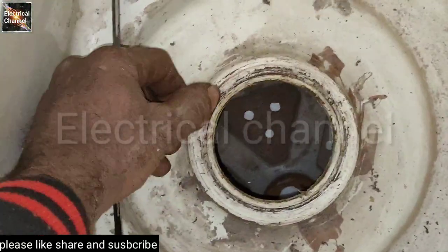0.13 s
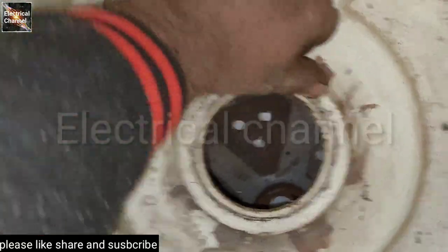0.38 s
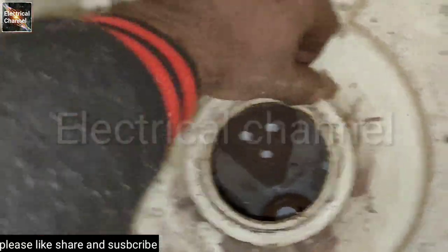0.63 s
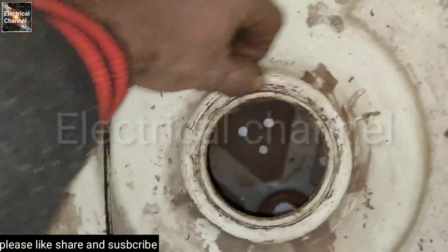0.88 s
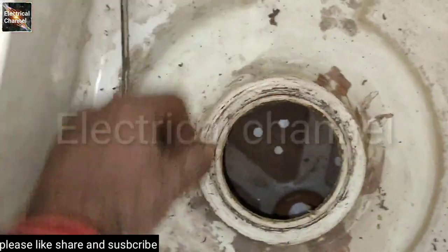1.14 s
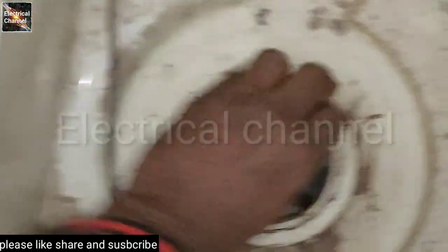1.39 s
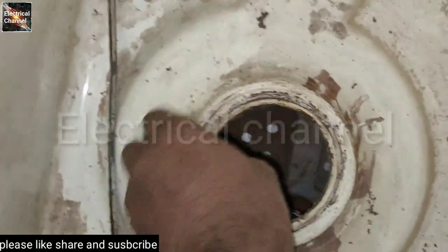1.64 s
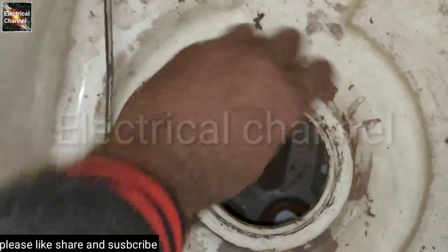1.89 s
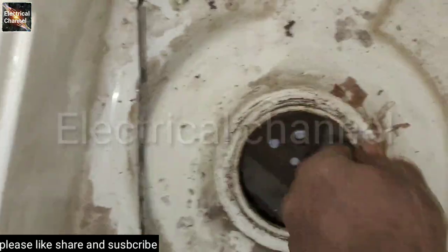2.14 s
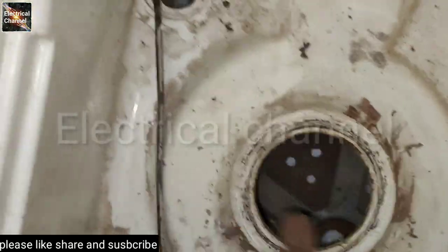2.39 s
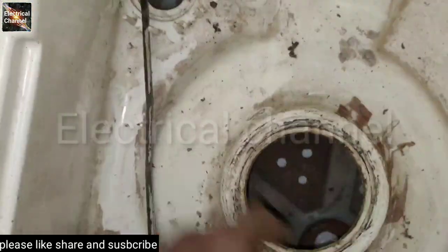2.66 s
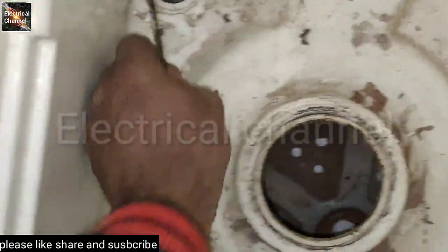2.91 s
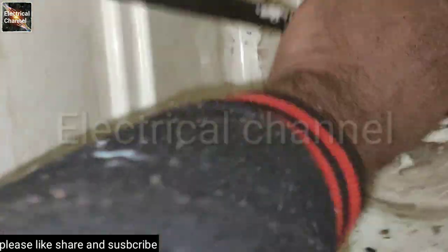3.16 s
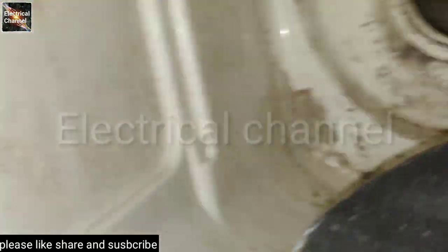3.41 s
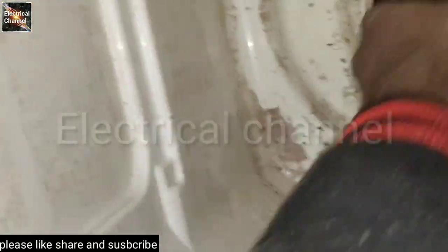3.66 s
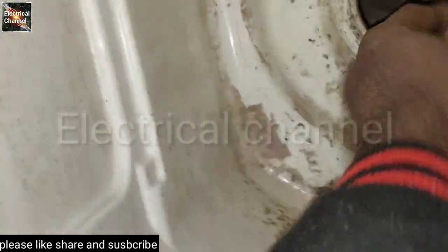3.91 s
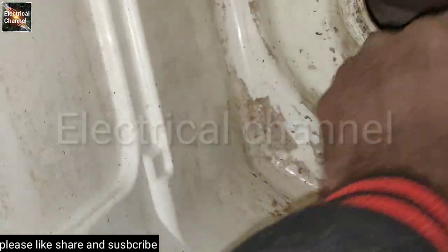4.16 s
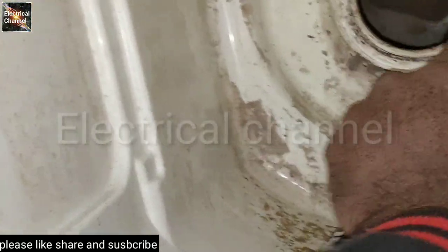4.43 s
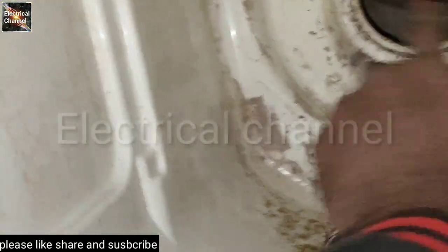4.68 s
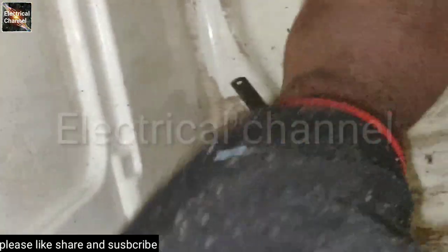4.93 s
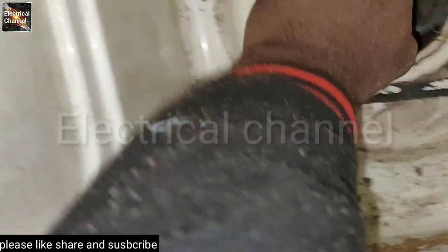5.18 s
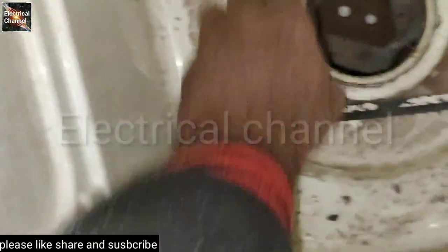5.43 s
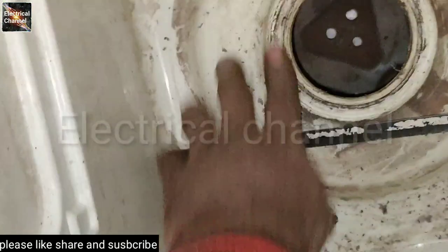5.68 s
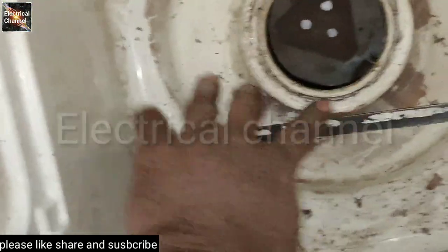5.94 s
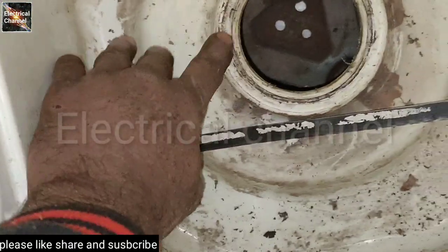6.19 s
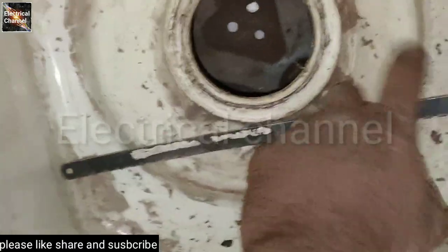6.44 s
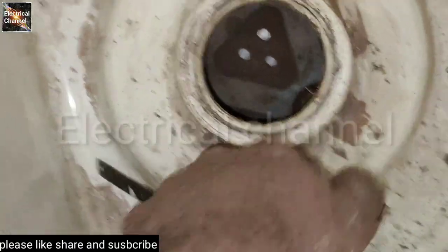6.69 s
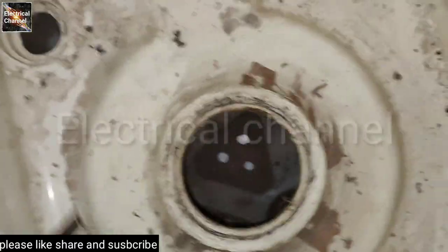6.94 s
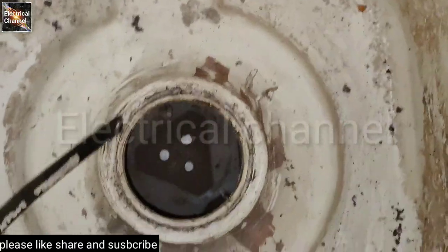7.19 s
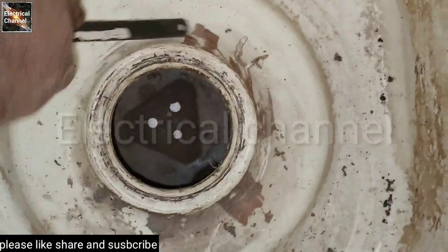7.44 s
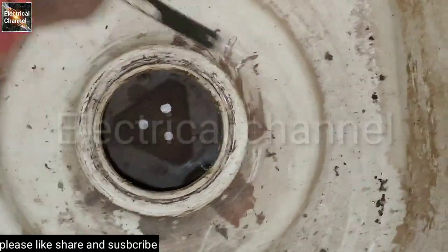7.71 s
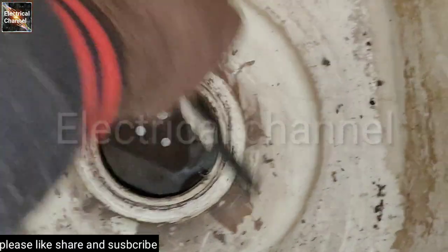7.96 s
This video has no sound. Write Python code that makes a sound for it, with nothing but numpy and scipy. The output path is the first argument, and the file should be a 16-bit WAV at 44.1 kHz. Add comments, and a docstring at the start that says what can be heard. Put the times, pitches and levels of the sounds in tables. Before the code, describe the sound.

Very close in a quiet room, fingers thump and rub a hollow plastic tub, making short low booms with little treble. After about three seconds a thin metal blade joins in, with dry gritty rasps, hard clicks and knocks on the wall. The clatter peaks near five seconds, eases, then returns in scattered scrapes and ends on a loud rasping clack. The loudest hits distort, and sound drops out once near the end.

```python
"""A hand rubs round the plastic rim of a washing machine tub and drags a thin saw blade over it, close by.
Sticking and slipping skin makes the hollow tub boom, while rubbed grit rasps and fizzes as noise-like grains.
Fingers thump as short low swings; the blade clicks as noise bursts, knocks the wall and rings as fading tones.
Behind it lies faint, drifting room noise; loud thumps overload the input, and it falls silent once, briefly."""
import sys
import numpy as np
from scipy import signal
from scipy.fft import rfft, irfft, next_fast_len
from scipy.io import wavfile
from scipy.ndimage import uniform_filter1d

SR = 44100
rng = np.random.default_rng(int(sys.argv[2]) if len(sys.argv) > 2 else 0)


def materialize(psi):
    """Save the field psi as 16-bit PCM at rate SR to the path in sys.argv[1].

    A 1-D psi becomes a single channel; in a 2-D psi each row is a channel.
    """
    bounded = np.clip(np.atleast_2d(psi).T, -1, 1)
    quanta = np.round(bounded * 32767).astype(np.int16)
    wavfile.write(sys.argv[1], SR, quanta)


def attenuation_scalar(level_db):
    """Turn a level in dB into a linear amplitude multiplier (20 dB per decade)."""
    decades = np.asarray(level_db, float) / 20
    return 10 ** decades


N = 356460  # length in samples

# Rubs of the hand or blade. Each row: start in seconds, length in seconds, boom level in dB,
# upper tub modes in dB, rasp in dB, fizz in dB.
RUB_STROKES = [(0.0, 0.068, -27, -41, -64, -59), (0.062, 0.099, -30, -30, -46.5, -53.5),
               (0.162, 0.046, -35, -38, -50, -55), (0.242, 0.077, -20.5, -34, -43.5, -53),
               (0.329, 0.097, -18, -25, -44.5, -41.5), (0.469, 0.082, -16, -21.5, -40.5, -51),
               (0.597, 0.099, -18.5, -25, -40, -51), (0.736, 0.15, -17.5, -23.5, -38.5, -45),
               (0.92, 0.068, -16, -28, -42.0, -50), (0.998, 0.081, -23, -24, -37.5, -41.5),
               (1.121, 0.15, -28.5, -38.5, -38.5, -48), (1.212, 0.08, -19, -26, -42, -46.5),
               (1.308, 0.092, -17.5, -26, -31.5, -39), (1.419, 0.1, -28.5, -42, -40, -47.5),
               (1.567, 0.053, -22, -24.5, -39.0, -52), (1.605, 0.046, -19, -24.5, -34.5, -47.0),
               (1.708, 0.07, -24, -25, -35, -44.5), (1.824, 0.16, -25.5, -27, -36.5, -46),
               (2.045, 0.14, -20, -24, -34, -42.5), (2.243, 0.047, -20.5, -40.0, -44, -51),
               (2.297, 0.28, -29.5, -32.5, -40.5, -51), (2.392, 0.12, -35, -40, -33.5, -38.5),
               (2.569, 0.17, -38, -29, -36.5, -37), (2.757, 0.089, -23.5, -35.5, -30, -36),
               (2.897, 0.12, -18, -30, -46, -48.5), (2.996, 0.066, -39, -45, -37.5, -42),
               (3.081, 0.11, -21, -26, -29.0, -37.5), (3.189, 0.11, -30.5, -36, -35, -40),
               (3.313, 0.15, -28.5, -46, -39.5, -45.0), (3.41, 0.13, -22, -21, -29.5, -37),
               (3.54, 0.11, -27.0, -36.0, -39.5, -42.5), (3.671, 0.12, -33, -29.0, -32.5, -41),
               (3.724, 0.18, -11, -21, -27, -40), (3.956, 0.063, -6.5, -27.5, -24.5, -34.5),
               (4.046, 0.074, -10.0, -21.0, -27, -37.5), (4.152, 0.073, -32, -40, -35.5, -50),
               (4.212, 0.17, -38, -51, -40.5, -55.5), (4.37, 0.037, -33, -30.5, -37.5, -59),
               (4.412, 0.025, -25, -29, -35.5, -45.5), (4.5, 0.103, -23, -38, -43.5, -57),
               (4.605, 0.13, -20.5, -23.0, -30.0, -43), (4.769, 0.085, -35.0, -39, -35.0, -54),
               (4.878, 0.13, -16, -19.5, -32.5, -40.5), (4.934, 0.04, -21.5, -25, -16, -27),
               (4.985, 0.063, -14.5, -18.5, -20.5, -38), (5.077, 0.073, -17, -39, -30.5, -37),
               (5.161, 0.091, -19, -24.5, -25.5, -36.0), (5.267, 0.066, -38, -47, -42, -54),
               (5.397, 0.1, -36, -37, -37.5, -43.5), (5.541, 0.077, -23, -32.5, -38.5, -30.5),
               (5.628, 0.059, -20.5, -26.5, -38.5, -42.5), (5.707, 0.068, -16.5, -28.5, -26, -45),
               (5.808, 0.158, -30, -36, -41.5, -45), (5.949, 0.141, -27, -41.5, -42, -45),
               (6.105, 0.091, -23, -40, -44, -46.5), (6.176, 0.097, -20, -25.5, -38.5, -45),
               (6.31, 0.081, -26, -46, -46.5, -65.0), (6.404, 0.071, -31.0, -43, -43.5, -48.5),
               (6.461, 0.077, -16, -23, -33, -41), (6.538, 0.094, -24, -32.5, -39.5, -43.5),
               (6.711, 0.044, -26, -23, -29.0, -39), (6.773, 0.073, -33.0, -40, -32, -40),
               (6.872, 0.128, -36.5, -66, -48.5, -55.5), (6.993, 0.063, -38.5, -37, -41, -40),
               (7.115, 0.27, -43.5, -54, -58.5, -60.5), (7.357, 0.06, -18.5, -21.5, -36, -45.5),
               (7.464, 0.24, -33, -28, -34.5, -42.5), (7.498, 0.098, -31, -32.5, -38, -43.5),
               (7.618, 0.06, -20, -18, -41, -47.5), (7.734, 0.038, -20.5, -29, -50, -39),
               (7.795, 0.053, -15.5, -19, -24.5, -35), (7.899, 0.13, -20.5, -22.5, -34, -43),
               (8.031, 0.091, -15, -16.5, -11, -25.5)]
# Where the hand is. Each row: time in seconds, first hollow in Hz, second hollow in Hz, left over right in dB,
# wall modes in dB against the blend of rasp and upper modes, both hollows in dB.
HAND_PLACES = [(0.0, 1310, 2230, 2.5, -5, -2), (0.09, 1570, 2260, 4.5, -9, 3),
               (0.18, 1320, 2270, -1, 1.5, 7.5), (0.94, 1390, 2130, -1, -8.5, 3),
               (0.99, 1525, 2380, 2, -7.5, 1), (1.62, 1247, 2210, -1, -3, -2),
               (3.06, 1480, 2290, 1, -4, -1), (3.15, 1320, 2140, -2.5, 2, -8.5),
               (3.31, 1670, 2100, 3.5, -6, -2), (3.49, 1250, 2240, -0.5, 0, -7),
               (3.89, 1575, 2090, 0, -1.5, -1.5), (4.0, 1360, 2250, -1.5, 6, 4),
               (4.28, 1640, 2120, 2, -1.5, -2.5), (4.39, 1380, 2190, -1, 0.5, -2.5),
               (5.29, 1280, 2120, -2, 2, -5), (6.91, 1290, 2070, 3, -3, -9), (7.27, 1100, 2370, 10, -21, 3),
               (7.34, 1380, 2060, 2.5, -3.5, 1.5), (7.79, 1145, 2200, -2.5, -0.5, 2),
               (8.08, 1254, 2220, -6.5, -4.5, -2.5)]
# Extra level of the first hollow. Each row: time in seconds, level in dB.
FIRST_HOLLOW_LEVEL = [(0, -3), (1.3, -2), (1.6, 0.5), (4.3, 0), (5.3, 1), (7.2, -2), (7.5, 5.5),
                      (8.08, 8.5)]
# Low modes of the hollow tub. Each row: pitch in Hz, width in Hz, relative level in dB.
LOW_TUB_MODES = [(81.6, 100, -23), (145, 17, -21), (173, 34, 6.5), (198.5, 170, -3)]
# Upper modes of the hollow tub. Each row: pitch in Hz, width in Hz, relative level in dB.
UPPER_TUB_MODES = [(365.7, 41, 7.5), (416, 31, 1.5)]
# Modes of the tub wall. Each row: pitch in Hz, width in Hz, relative level in dB.
WALL_MODES = [(512, 120, -1.5), (590, 28, -4.5), (699, 6.1, -5.5), (820, 480, -25)]
# Wall modes that the blade reaches. Each row: pitch in Hz, width in Hz, relative level in dB.
BLADE_WALL_MODES = [(668, 135, 7), (776, 330, -8)]
# Level of those modes against the other wall modes. Each row: time in seconds, level in dB.
BLADE_WALL_LEVEL = [(0, -21), (2.3, -19), (3.4, -14), (4.3, -17), (4.6, -12), (5.0, 2.5), (5.4, -4.5),
                    (5.9, -10), (6.5, -10.5), (6.9, 1.5), (7.1, -17), (8.08, -20)]
# Modes of the rim. Each row: pitch in Hz, width in Hz, relative level in dB.
RIM_MODES = [(1234, 25, 6.5), (1370, 300, 7.5), (1655, 110, 5), (2010, 630, 5.5), (2330, 180, -6.5),
             (2710, 310, -8.5), (3360, 300, -47), (4540, 1400, -50)]
# Modes of the blade. Each row: pitch in Hz, width in Hz, relative level in dB.
BLADE_MODES = [(5800, 770, 27), (7220, 1400, 20), (7790, 170, 27), (8620, 160, 17.5), (9100, 500, -50),
               (11500, 2500, -37), (14000, 2000, -43)]
# Colour of the rasp. Each row: frequency in Hz, relative level in dB.
RASP_SPECTRUM = [(470, -2), (800, -14), (913, -29), (1120, -4.5), (1530, -6), (1650, -4), (1830, -7),
                 (2300, -6.5), (4600, -26), (5980, -25), (10100, -120)]
# Colour of the fizz on top. Each row: frequency in Hz, relative level in dB.
FIZZ_SPECTRUM = [(2120, -6), (3600, -15.5), (4180, -21), (4540, -15), (5890, -7), (6640, -10.5), (7950, -7),
                 (9010, -11.5), (10500, -18), (14800, -23.5), (15500, -27.5), (16000, -50)]
# Finger thumps on the tub. Each row: start in seconds, level in dB, pitch of the pressed wall in Hz,
# upper modes in dB against the low swing, milliseconds until the hand damps it.
FINGER_THUMPS = [(0.078, -16.5, 153, -24, 11), (0.167, -27, 153, 9, 14), (0.263, -18, 150, 2.5, 40),
                 (0.365, 0, 147, -20, 18), (0.491, -6.5, 111.4, -10, 23), (0.517, 2, 152, -45, 16),
                 (0.549, -6, 148, -22, 12.6), (0.649, -8, 150, -28, 22), (0.666, -5.5, 134, -10, 13),
                 (0.696, -4.5, 146, -29, 9.4), (0.743, -0.5, 162.4, -7, 20), (0.79, 2.5, 155.6, -7, 11),
                 (0.838, -7.5, 141, -29, 33), (0.953, -7.5, 137, 0, 21), (1.042, -12, 119.4, -2.5, 23),
                 (1.143, -12, 161, -2, 24), (1.229, -20.5, 148, -10, 54), (1.331, 1.5, 166, -5, 11),
                 (1.368, -4, 148, -4.5, 20), (1.48, -12, 157.5, -11, 12), (1.577, 4, 147, -0.5, 9.5),
                 (1.63, -15.5, 161, -2, 15), (1.712, -10, 173, -17, 8.8), (1.758, -12, 145.7, -0.5, 15),
                 (1.847, -17.5, 174, 2.5, 10), (1.949, -16, 147, -1, 15), (2.073, -19, 126, 10, 24),
                 (2.254, -0.5, 146, -7, 6.5), (2.438, -11.5, 141, -1, 8.6), (2.615, -19.5, 140, -15, 21),
                 (2.683, -17, 178, -19, 23), (2.784, -13.5, 175, 4.5, 14), (2.83, -12.5, 164, -2, 6.4),
                 (2.911, 2, 151, -3, 8.4), (2.932, -9, 150, -13, 10), (2.964, -0.5, 140, -7.5, 7),
                 (3.17, -18.5, 120, 8, 11), (3.453, -5.5, 154, 4, 13), (3.512, -9.5, 143, 0, 16),
                 (3.6, -16, 153, -5, 22), (3.687, -14.5, 142.5, 6.5, 3), (3.771, -4.5, 163, 8, 12),
                 (3.808, 6, 153.5, -7.5, 15), (3.855, 5.5, 139.6, -9.5, 7.5), (3.974, 3.5, 144, -9, 13.6),
                 (4.069, -0.5, 164.5, 2, 19), (4.108, -2, 154.4, -2, 19.4), (4.188, -18, 162, -25, 23),
                 (4.26, -11.5, 181, -6, 7.5), (4.39, -14, 145, 5, 12), (4.454, -15, 139, 1.5, 24),
                 (4.52, 3, 150, -8, 8.6), (4.565, -4.5, 156, -6.5, 5.5), (4.645, -5, 141, 5, 24),
                 (4.675, 1.5, 148, -19, 7.1), (4.716, -4, 140, -11, 4.7), (4.786, -15, 130, 1.5, 16),
                 (4.925, 4.5, 116, -15.5, 6.1), (4.988, -7, 189, 9.5, 9.3), (5.115, -25, 166, -1, 34),
                 (5.178, -4.5, 139.6, -3, 14.7), (5.246, -14, 155, 6, 18), (5.439, -27, 158, -19, 14),
                 (5.586, -2, 149.4, -6.5, 11), (5.647, -15, 131, 2.5, 26), (5.714, -13, 190, -21, 20),
                 (5.85, -7, 131, -17, 4), (6.013, -8, 153, -5.5, 15), (6.137, -19.5, 119.5, -2, 15),
                 (6.225, 3.5, 139, -6, 15), (6.346, -9.5, 140, -8.5, 8.7), (6.481, -27, 174, -19, 8.3),
                 (6.508, 2.5, 186.6, -1, 8.8), (6.709, -7, 153, -11, 10.6), (6.723, -10, 177, -1, 11),
                 (6.82, -18.5, 153, -13, 18), (7.375, -13.5, 167, 2, 16), (7.417, -17.5, 177.4, 13, 30),
                 (7.554, -19.5, 172, 9.5, 10), (7.642, -10, 156, 1.5, 6.9), (7.681, -4, 138, -2.5, 19),
                 (7.806, -2, 136.5, -0.5, 7), (7.906, -4.5, 130, -5, 8.5), (7.963, -10, 136, -16, 5.4)]
# Nail and blade clicks. Each row: start in seconds, level in dB, treble in dB against the middle,
# burst length in milliseconds (at least 2 is used), left over right in dB.
NAIL_AND_BLADE_CLICKS = [(0.162, -30.5, -5.5, 33, -5), (0.2656, -34.5, 0, 29, 0.5),
                         (0.752, -39.5, -5, 11, -13.5), (0.9397, -38, -1, 11, -15),
                         (1.1426, -40, -35, 1.4, 30.5), (1.3056, -26, -13, 13, -5),
                         (1.4676, -26, -18, 9.1, 12), (1.5754, -21.5, -12.5, 15, 0),
                         (1.631, -18, -16, 8.4, -6), (1.8517, -37.5, -28, 9.2, -24),
                         (1.942, -45, -23, 15, -9), (2.0718, -34, -32, 22, -28),
                         (2.3345, -21.5, -21, 11, -6), (2.5885, -32, -19, 16, 0),
                         (2.7838, -22, -36, 11, -20), (2.915, -22.5, -32, 6, 2),
                         (3.101, -3.5, -10, 8.6, -6), (3.1179, -2.5, -30, 8.6, 0),
                         (3.171, 0.5, -17.5, 13, -2.5), (3.2704, 1.5, -4.5, 5.7, -1.5),
                         (3.4231, -24, -28, 4.8, -15), (3.467, -8.5, -2.5, 9.1, -3),
                         (3.531, -15, -8.5, 13, -9), (3.687, -10.5, -9.5, 11, -2),
                         (3.7223, -11, -3, 6, -1.5), (3.7733, -9.5, -13, 14, -4),
                         (3.8103, -6, -25, 11, -4.5), (3.8625, -37, -45, 15, -14),
                         (3.871, -6.5, -25, 11, -6), (3.9933, -4, -8.5, 15.6, -9),
                         (4.0727, -9.5, -15, 14, -7), (4.391, -20, -12.5, 5.3, -4),
                         (4.52, -19, -24, 12, -4.5), (4.634, -20.5, -36, 6.5, -4),
                         (4.7142, -5, -0.5, 14.4, 4), (4.793, -11, -38, 35, -4),
                         (4.8917, -10.5, -7.5, 13, -1.5), (4.9308, -6, -11, 14, -1.5),
                         (4.9683, -6, -5, 21, -0.5), (4.9848, 1, -32, 2.8, -2),
                         (5.0237, -21.5, -36, 9, -23), (5.0579, -10.5, -23, 11, -16),
                         (5.1739, -14, -43, 11, -9), (5.2085, -9.5, -7, 9.8, -9.5),
                         (5.2329, -13, -21, 19, -12), (5.5478, -35.5, -17, 34, -24),
                         (5.6686, -17.5, -1, 14, -5.5), (5.7191, -5.5, -9.5, 11, -2.5),
                         (5.7478, -8.5, -15, 23, -0.5), (5.761, -6, -44, 8.4, -13.5),
                         (6.352, -35.5, -30, 15, 12), (6.4323, -36, -19, 6.6, -4),
                         (6.4642, -26, -21, 16, -3.5), (6.5099, -8.5, -15.5, 19, -7.5),
                         (6.6122, -15.5, -25, 8, -3.5), (6.7311, 2, -39, 8.9, -9.5),
                         (6.8265, -16, -26, 16, -10), (7.012, -14, 3, 15.4, -0.5),
                         (7.3613, -13.5, -41.5, 10, -6), (7.4057, -14, -14, 78, -5.5),
                         (7.4697, -5, -21, 15.4, -6), (7.561, -2.5, -2, 10.5, -3),
                         (7.645, -20, -13, 20, -12), (7.7064, -2.5, -37.5, 10.6, -5.5),
                         (7.8108, -17, -7, 14, -15.5), (7.914, -6, -16, 19, 4.5),
                         (8.007, -23, -0.5, 8.2, -2), (8.053, -6.5, -26, 9, -9), (8.0755, 5, -20, 5.3, 0)]
# Nail or blade edge knocking the wall. Each row: start in seconds, peak in dB.
WALL_KNOCKS = [(2.917, -18), (2.968, -25), (3.464, -14), (3.776, -11), (3.811, -20), (3.998, 0.5),
               (4.072, -17), (4.388, -12), (4.632, -14), (4.654, -10), (4.715, 5), (4.897, -2), (4.986, 5),
               (5.0, -1), (5.023, -2.5), (5.037, -13), (5.209, -0.5), (5.746, -6), (6.51, -19),
               (6.733, -0.5)]
# Blade teeth singing and the wall wobbling. Each row: start in seconds, level in dB, pitch in Hz,
# rise in seconds, time to fall by 60 dB in seconds.
LONG_RINGS = [(4.958, -17.5, 8620, 0.0033, 0.092), (4.985, -24.5, 8620, 0.0031, 0.074),
              (5.008, -27.5, 8620, 0.0036, 0.085), (5.17, -25, 7700, .01, 0.071),
              (6.528, -2.5, 91, 0.05, 0.38)]
# Colour of the room noise. Each row: frequency in Hz, relative level in dB.
ROOM_SPECTRUM = [(18, -53), (30, -23), (112, -1), (165, -4), (273, -28), (394, -19), (721, -42), (844, 3),
                 (1590, -33), (2540, -8), (3770, -21), (4910, -40), (6550, -11), (8980, -41), (16000, -35)]
# Level of the room noise. Each row: time in seconds, level in dB.
ROOM_LOUDNESS = [(0, -58), (1, -49), (2, -50.5), (3, -45.5), (4.3, -63.5), (5.3, -50), (6.3, -55.5),
                 (6.8, -55.5), (7.05, -45.5), (7.34, -42.5), (7.45, -42.5), (8.08, -35.5)]
# Difference in colour between the two sound openings. Each row: frequency in Hz, left over right in dB.
LEFT_RIGHT_COLOUR = [(60, -8), (110, -0.5), (200, -2.5), (380, 1.5), (700, 4), (1290, 1), (2380, 7),
                     (4400, 8.5), (8120, -7), (15000, 4.5)]
# When the input goes silent: start in seconds, end in seconds.
SILENT_SPAN = (7.883, 7.910)

RUB_ATTACK_S, RUB_SAG_DB_PER_S = 0.026, -2
BOOM_T60_S, GRIT_T60_S = 0.26, 0.24  # time to fall by 60 dB after a rub
WALL_FROM_RASP = 0.49  # the wall level follows the rasp by this share, the upper modes by the rest
PORT_LAG_S, PORT_SAME = 0.00042, 0.17  # delay to the left opening, share of sound alike in both


def boom():
    """Soft finger pads judder and drive the tub modes; hard contact reaches the wall modes too."""
    soft_push = np.hanning(round(0.003 * SR))
    judder = signal.oaconvolve(slips(400, 2.2)[0], soft_push)[:N]
    low = evened(through(judder, LOW_TUB_MODES))
    upper = evened(through(judder, UPPER_TUB_MODES))

    hard_push = np.hanning(round(0.0012 * SR))[None]
    hard = signal.oaconvolve(slips(900, 2.1, channels=2), hard_push, axes=1)[:, :N]
    wall = evened(through(hard, WALL_MODES))
    blade_wall = evened(through(hard, BLADE_WALL_MODES))
    wall = ports(wall + attenuation_scalar(curve(BLADE_WALL_LEVEL, index=1)) * blade_wall)

    boom_db, upper_db, rasp_db = np.transpose(RUB_STROKES)[2:5]
    wall_db = WALL_FROM_RASP * rasp_db + (1 - WALL_FROM_RASP) * upper_db
    out = rubbing(boom_db, BOOM_T60_S) * low + rubbing(upper_db, BOOM_T60_S) * upper
    return out + attenuation_scalar(curve(HAND_PLACES, index=4)) * rubbing(wall_db, BOOM_T60_S) * wall


def rasp():
    """Grit under skin and blade: clumped grains through the rim and the moving hand's hollows, with fizz."""
    clumps = attenuation_scalar(1.8 * evened(uniform_filter1d(rng.standard_normal(N), 500)))
    grit = slips(5000, 1.9, channels=2) * clumps
    coloured = 1.88 * evened(shaped(grit, lambda hz: attenuation_scalar(read(RASP_SPECTRUM, hz))))
    coloured += 0.53 * evened(through(grit, RIM_MODES))

    # each hollow is two resonances in a row, moving with the hand
    first_hz, second_hz = curve(HAND_PLACES, index=1), curve(HAND_PLACES, index=2)
    first = evened(resonate(resonate(grit, first_hz, 160), first_hz, 150))
    second = evened(resonate(resonate(grit, second_hz, 170), second_hz, 170))
    hollows = attenuation_scalar(curve(FIRST_HOLLOW_LEVEL, index=1) - 6) * first + 0.22 * second
    coloured += attenuation_scalar(curve(HAND_PLACES, index=5)) * hollows

    fizz = evened(shaped(grit, lambda hz: attenuation_scalar(read(FIZZ_SPECTRUM, hz))))
    rasp_db, fizz_db = np.transpose(RUB_STROKES)[4:6]
    both = rubbing(rasp_db, GRIT_T60_S) * evened(coloured) + rubbing(fizz_db, GRIT_T60_S) * fizz
    pan_db = curve(HAND_PLACES, index=3) * np.array([[0.5], [-0.5]])
    return attenuation_scalar(pan_db) * ports(patchy(both, patchy_db=3.5))


def thumps():
    """The wall swings up until the hand damps it; the edge of the blow rings the upper modes."""
    out, t = np.zeros(N), np.arange(SR // 8) / SR
    edge = np.convolve(ring(UPPER_TUB_MODES + WALL_MODES), np.hanning(round(0.002 * SR)))[:len(t)]
    edge = np.roll(edge, round(0.00307 * SR)) * (t > 0.003)  # the hard edge lands just after the soft pad
    edge = edge / abs(edge).max()
    for s, db, hz, upper_db, ms in FINGER_THUMPS:
        damped = attenuation_scalar(-60 * np.maximum(t - ms / 1000, 0) / 0.04)
        swing = (1 - np.exp(-t / 0.0037)) * np.sin(2 * np.pi * hz * t)
        add(out, s, attenuation_scalar(db) * damped * (swing + attenuation_scalar(upper_db) * edge))
    return out


def clicks():
    """Each click is a short burst of chatter through rim and blade modes, with a tail inside the tub."""
    out, t = np.zeros((2, N)), np.arange(SR // 6) / SR
    rim, blade = ring(RIM_MODES)[None], ring(BLADE_MODES)[None]
    for s, db, treble_db, ms, pan_db in NAIL_AND_BLADE_CLICKS:
        chatter = rng.standard_normal((2, len(t)))
        progress = np.clip(t * 1000 / max(ms, 2), 0, 1)
        swell = 1.9 * progress ** 0.078 * (1 - progress) ** 0.67
        tail = attenuation_scalar(-22.5 - 60 * t / 0.28) * progress
        burst = chatter * (swell + tail)
        middle = signal.fftconvolve(burst, rim, axes=1)[:, :len(t)]
        treble = signal.fftconvolve(burst, blade, axes=1)[:, :len(t)]
        sound = middle / abs(middle).max() + attenuation_scalar(treble_db) * treble / abs(treble).max()
        pan = attenuation_scalar(np.array([[pan_db], [-pan_db]]) / 2)
        add(out, s, attenuation_scalar(db) * ports(sound) * pan)
    return out


def knocks():
    """A hard, short contact rings the wall and rim modes; the hand damps them at once."""
    out, t = np.zeros(N), np.arange(SR // 8) / SR
    modes = ring(WALL_MODES) + 0.8 * ring(BLADE_WALL_MODES) + 0.23 * ring(RIM_MODES)
    contact = np.hanning(round(0.00066 * SR) + 2)
    tap = np.convolve(modes, contact)[:len(t)]
    tap *= attenuation_scalar(-60 * t / 0.12)  # falls an extra 60 dB in 0.12 s
    for s, db in WALL_KNOCKS:
        add(out, s, attenuation_scalar(db) * tap / abs(tap).max())
    return np.array([np.roll(out, round(PORT_LAG_S * SR)), out])


def sing():
    """Single modes of blade and wall ring on as pure tones that rise and fade away."""
    out, t = np.zeros(N), np.arange(SR // 3) / SR
    for s, db, hz, rise, t60 in LONG_RINGS:
        level = attenuation_scalar(db - 60 * t / t60) * np.minimum(t / rise, 1)
        add(out, s, level * np.sin(2 * np.pi * hz * t))
    return out


def room():
    """Faint room noise whose colour drifts and whose level rises and falls."""
    noise = shaped(rng.standard_normal((2, N)), lambda hz: attenuation_scalar(read(ROOM_SPECTRUM, hz)))
    return attenuation_scalar(curve(ROOM_LOUDNESS, index=1)) * evened(patchy(noise, patchy_db=2))


def slips(per_s, spread_db, channels=1):
    """Sparse stick-slip impulses of random sign and uneven size; a few are large."""
    size = attenuation_scalar(spread_db * np.minimum(rng.exponential(1, (channels, N)), 4))
    sign = rng.choice([-1., 1.], (channels, N))
    happens = rng.random((channels, N)) < per_s / SR
    return size * sign * happens


def rubbing(level_db, t60):
    """Gain over time: each rub sets in fast, sags while it lasts and dies away; powers add."""
    power = np.zeros(N)
    for (start, length, *_), db in zip(RUB_STROKES, level_db):
        t = np.arange(0, length + 0.4, 1 / SR)
        sag_db = RUB_SAG_DB_PER_S * np.minimum(t, length)
        fade_db = -60 * np.maximum(t - length, 0) / t60
        gain = np.minimum(t / RUB_ATTACK_S, 1) * attenuation_scalar(db + sag_db + fade_db)
        add(power, start, gain ** 2)
    return np.sqrt(power)


def ring(modes):
    """Response of a set of modes to one tap, peak 1; wider modes die away sooner."""
    t = np.arange(SR // 8) / SR
    out = np.zeros(len(t))
    for hz, width, db in modes:
        out += attenuation_scalar(db) * width * np.exp(-np.pi * width * t) * np.sin(2 * np.pi * hz * t)
    return out / abs(out).max()


def through(x, modes):
    """Lets a sound drive a set of modes, so that each impulse rings them."""
    response = ring(modes).reshape((1,) * (x.ndim - 1) + (-1,))
    return signal.oaconvolve(x, response, axes=-1)[..., :N]


def resonate(x, hz, width):
    """A resonance of gain 1 that follows the curve hz."""
    turn, r = np.exp(2j * np.pi * np.cumsum(hz) / SR), np.exp(-np.pi * width / SR)
    # shift the pitch down to zero, smooth, then shift it back up
    return 2 * (turn * signal.lfilter([1 - r], [1, -r], x / turn)).real


def patchy(x, patchy_db):
    """Colour that shifts from moment to moment in patches of a few hundred Hz."""
    z = signal.stft(x, nperseg=512, noverlap=384)[2]
    patches = uniform_filter1d(rng.standard_normal(z.shape[-2:]), size=4, axis=0)  # across pitch
    patches = uniform_filter1d(patches, size=14, axis=1)  # across time
    return signal.istft(z * attenuation_scalar(patchy_db * evened(patches)), nperseg=512, noverlap=384)[1][..., :N]


def ports(x):
    """Two sources reach two sound openings: partly alike, the shared part later on the left."""
    late = np.roll(x[0], round(PORT_LAG_S * SR))
    left = PORT_SAME * late + np.sqrt(1 - PORT_SAME ** 2) * x[1]
    return np.array([left, x[0]])


def shaped(x, gain_at):
    """Multiplies the spectrum by a function of frequency."""
    size = next_fast_len(N + 4096)
    return irfft(rfft(x, size) * gain_at(np.fft.rfftfreq(size, 1 / SR)), size)[..., :N]


def read(points, hz):
    """Reads a colour table at any frequency, on a logarithmic pitch scale."""
    f, value = np.transpose(points)
    return np.interp(np.log(hz + 1), np.log(f + 1), value)


def curve(rows, index):
    """Draws straight lines over time between the values in one column of a table."""
    rows = np.array(rows)
    return np.interp(np.arange(N) / SR, rows[:, 0], rows[:, index])


def evened(x):
    """Scales a signal to an average (rms) level of 1."""
    return x / np.sqrt(np.mean(x ** 2) + 1e-20)


def add(mix, s, sound):
    """Adds a sound to the mix from s seconds on, cut off at the end of the mix."""
    part = mix[..., round(s * SR):][..., :sound.shape[-1]]
    part += sound[..., :part.shape[-1]]


def scene():
    """Boom, thumps and rings are alike in both openings; wall contact, grit, clicks and room differ."""
    return boom() + rasp() + thumps() + clicks() + knocks() + sing() + room()


def roll_off(x):
    """The treble ends steeply here."""
    return signal.sosfilt(signal.butter(12, 16250, fs=SR, output="sos"), x)


def record(dry):
    """Cuts deep bass, shares the bass between sides, colours each side, drops out once and overloads."""
    dry = signal.sosfilt(signal.butter(3, 84.6, "high", fs=SR, output="sos"), dry)
    mid, side = (dry[0] + dry[1]) / 2, (dry[0] - dry[1]) / 2
    side = shaped(side, lambda hz: 1 / (1 + (624 / (hz + 1)) ** 4))  # below about 624 Hz both sides are alike
    left = shaped(mid + side, lambda hz: attenuation_scalar(read(LEFT_RIGHT_COLOUR, hz) / 2))
    right = shaped(mid - side, lambda hz: attenuation_scalar(-read(LEFT_RIGHT_COLOUR, hz) / 2))

    t = np.arange(N) / SR
    silent_from, silent_to = SILENT_SPAN
    live = 1 - np.clip((t - silent_from) / 0.0059, 0, 1) * (t < silent_to)  # fades out, returns at once
    x = np.array([left, right]) * live
    overloaded = x / (1 + abs(x) ** 14) ** (1 / 14)  # peaks flatten just below full scale
    return roll_off(overloaded)


dry = scene()
out = record(dry)
materialize(out)
```